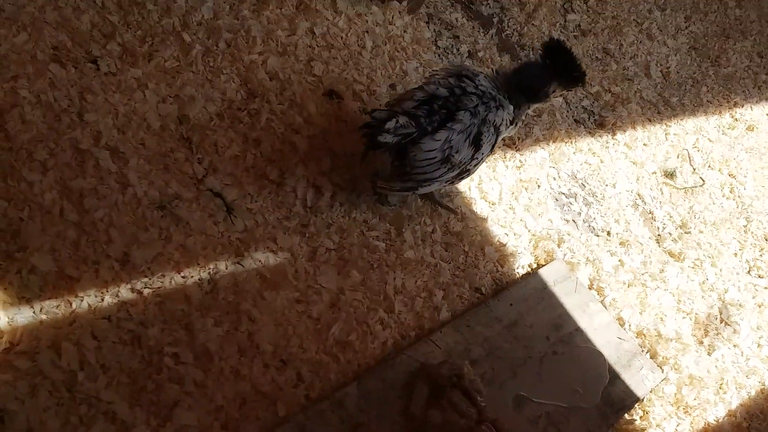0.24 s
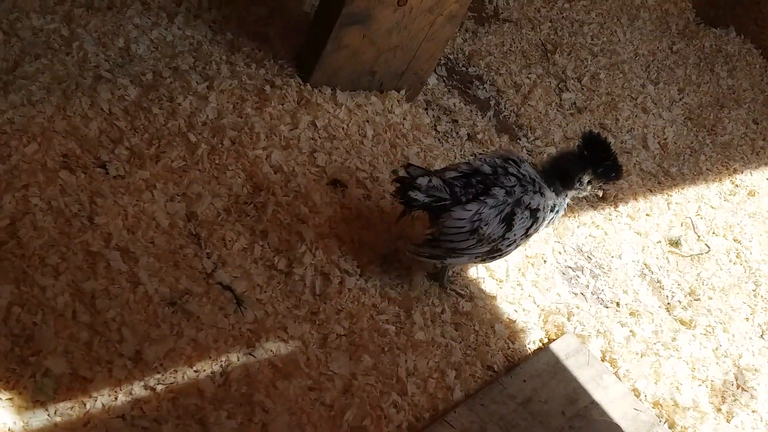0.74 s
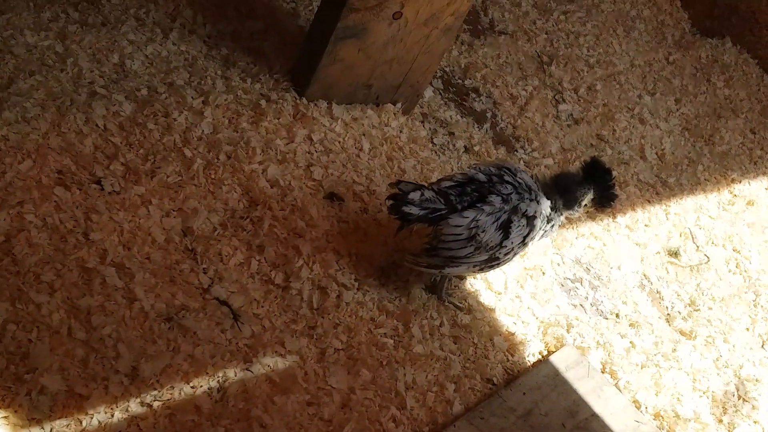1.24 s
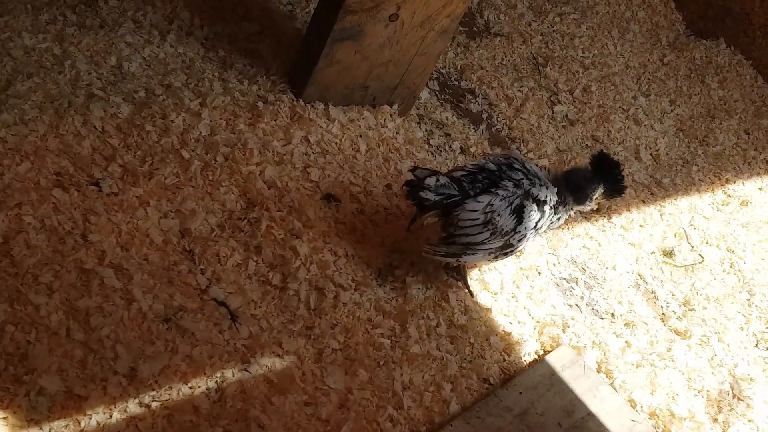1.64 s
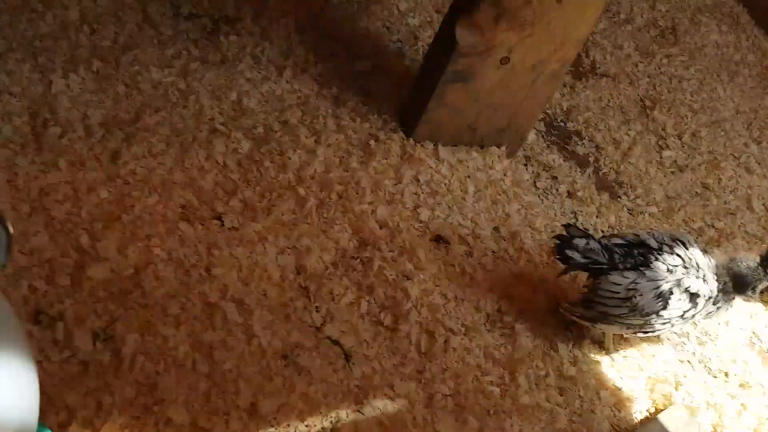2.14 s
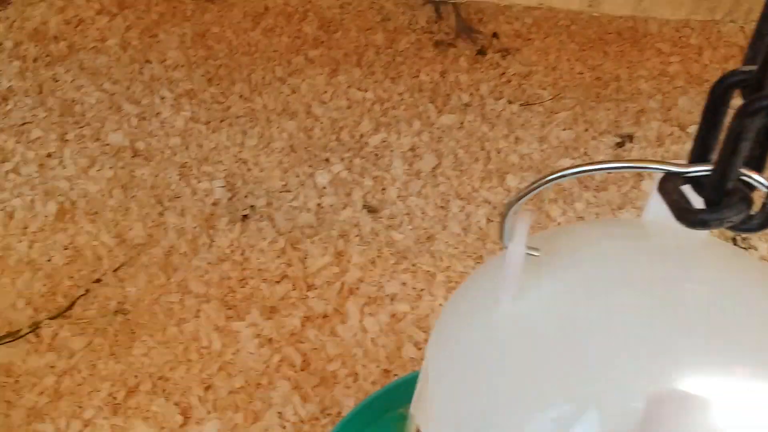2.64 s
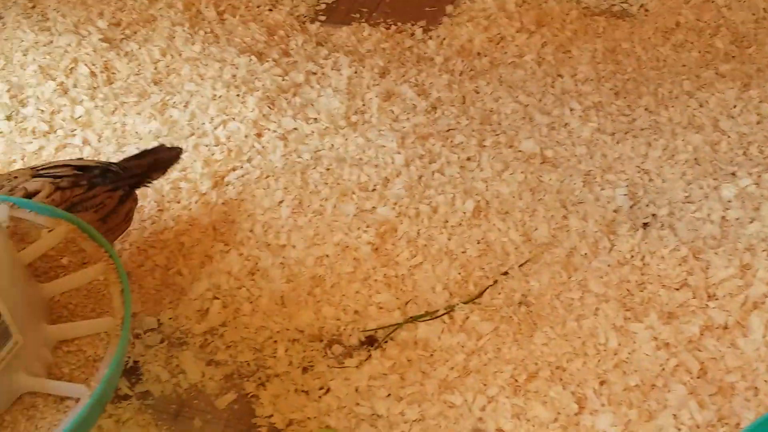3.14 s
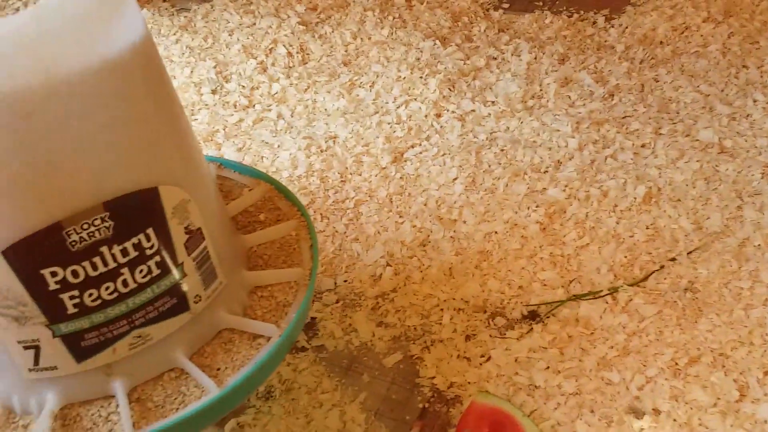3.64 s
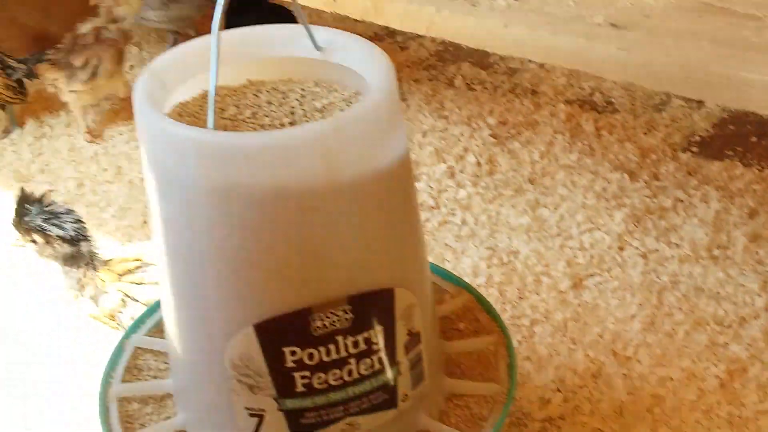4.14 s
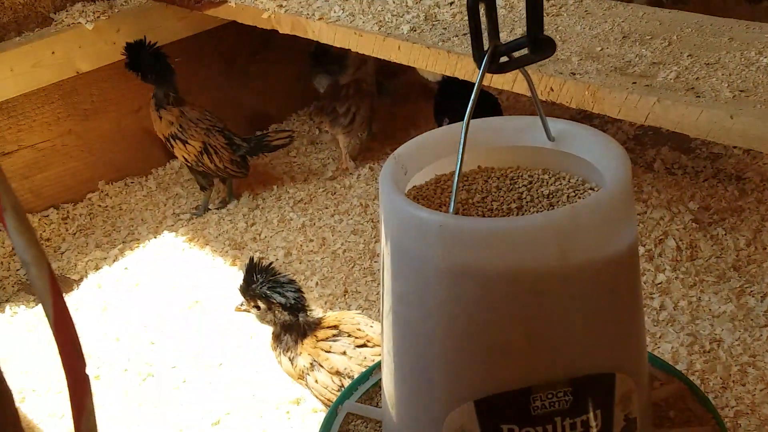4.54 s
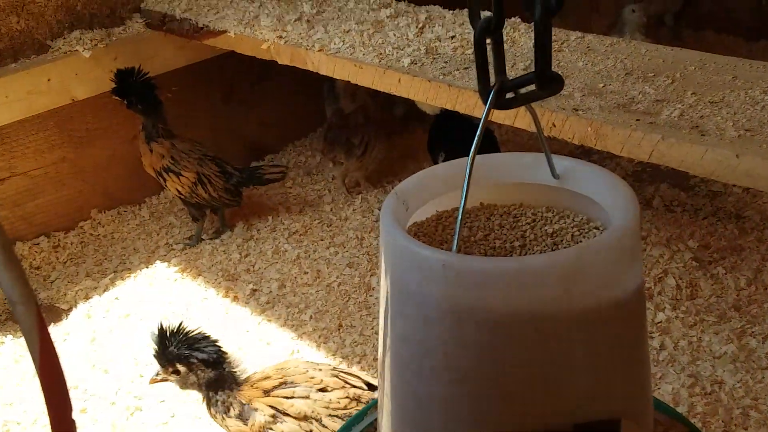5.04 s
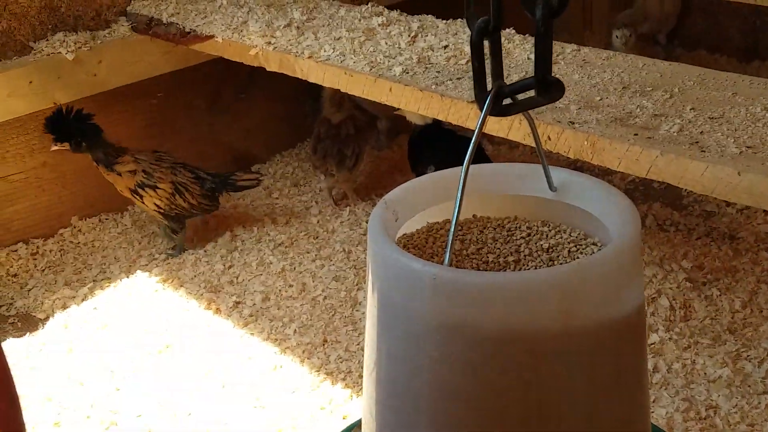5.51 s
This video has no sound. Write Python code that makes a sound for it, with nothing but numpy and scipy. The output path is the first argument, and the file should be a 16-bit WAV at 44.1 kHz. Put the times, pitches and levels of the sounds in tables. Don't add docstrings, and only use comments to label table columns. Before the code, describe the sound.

A flock of young chickens gives short, hoarse, falling peeps in a small wooden coop. A piercing cry comes around one and a half seconds, then a close twig snap, gritty shoe scuff and low board thump just after two. Peeping resumes, with low clucks from older birds. Stereo microphones sit among the flock, with short close wall reflections.

```python
import sys
import numpy as np
from scipy import signal
from scipy.fft import rfft, irfft, next_fast_len
from scipy.io import wavfile
from scipy.ndimage import uniform_filter1d, map_coordinates

SR = 44100
rng = np.random.default_rng(int(sys.argv[2]) if len(sys.argv) > 2 else 0)


def undo_db(level):
    steps = np.asarray(level, float) / 20
    return 10 ** steps


def transcribe(signal):
    frames = np.atleast_2d(signal).T
    limited = np.clip(frames, -1, 1)
    pcm = np.round(limited * 32767).astype(np.int16)
    wavfile.write(sys.argv[1], SR, pcm)


N = 254699


def unit(x):
    return x / np.sqrt(np.mean(x ** 2) + 1e-20)


def along(points, hz):
    f, v = np.transpose(points)
    return np.interp(np.log(hz + 1), np.log(f + 1), v)


def curves(rows):
    s, *cols = np.transpose(rows)
    return [np.interp(np.arange(N) / SR, s, c) for c in cols]


def wobble(rate, size=N):
    knots = rng.standard_normal(int(size * rate / SR) + 4)
    return map_coordinates(knots, [np.arange(size) * rate / SR])


def filtered(x, response):
    m = next_fast_len(N + 8192)
    return irfft(rfft(x, m) * response(np.fft.rfftfreq(m, 1 / SR)), m)[..., :N]


def panned(db):
    return np.sqrt(2 / (1 + undo_db(np.multiply.outer([-2, 2], db))))


def bursts(rows, rise_s, fall_s):
    t = np.arange(N) / SR
    total = 0
    for s, hold, db in rows:
        rise = 60 * np.maximum(s - t, 0) / rise_s
        fall = 60 * np.maximum(t - s - hold, 0) / fall_s
        total = total + undo_db(db - rise - fall)
    return total


# frequency in Hz, likeness from 0 to 1.
ALIKE = [(60, 0.87), (240, 0.89), (950, 0.41), (3770, 0.25), (15000, 0.35)]


def rush(spectrum, grain_db, grain_rate):
    pair = rng.standard_normal((2, N)) * undo_db(grain_db * wobble(grain_rate))

    def mid_side(hz):
        turn = np.arccos(np.clip(along(ALIKE, hz), 0, 1)) / 2
        return undo_db(along(spectrum, hz)) * [np.cos(turn), np.sin(turn)]

    mid, side = filtered(pair, mid_side)
    return unit(np.array([mid + side, mid - side]))


# frequency in Hz, level in dB per Hz.
AIR = [(150, -36), (250, -12), (1410, -9), (2000, -20), (3140, -24), (4360, -7), (8200, 12), (8800, -24)]


def still_air():
    return undo_db(-80 + 1.1 * wobble(2.5)) * rush(AIR, grain_db=1, grain_rate=14)


# frequency in Hz, level in dB per Hz.
RUMBLE = [(15, -69), (30, -21), (45, -4), (103, 3), (129, 1), (200, -16.5), (390, -12.5), (660, -120)]
# start in seconds, hold in seconds, level in dB.
TRAMPLES = [
    (0.0, 0.025, -62),
    (1.3, 0.057, -71.5),
    (2.25, 0.072, -72),
    (2.62, 0.21, -76),
]
# time in seconds, peak in dB, pitch in Hz.
STEPS = [(0.566, -46, 198), (0.828, -53.5, 319), (5.374, -54, 270), (0.657, -45, 114), (0.793, -40.5, 112),
         (0.962, -37.5, 135), (1.992, -38, 116), (2.082, -35, 166), (2.325, -24, 209.5), (2.562, -78, 111),
         (2.997, -65, 99), (3.352, -63, 94.2), (3.46, -49.5, 118), (3.561, -37, 118), (3.976, -44, 112),
         (5.019, -65, 104), (5.218, -75, 97), (5.365, -36.5, 118), (5.542, -60, 98)]


def boards():
    thuds = np.zeros(N + SR)
    t = np.arange(SR // 8) / SR
    for s, db, hz in STEPS:
        envelope = undo_db(db - 9.5 - 60 * t / 0.14) * (1 - np.exp(-t / 0.0018))
        thuds[round(s * SR):][:len(t)] += envelope * np.sin(2 * np.pi * hz * t)
    tread = undo_db(-73.5) + bursts(TRAMPLES, rise_s=0.17, fall_s=0.63)
    rumble = undo_db(6.0) * tread * rush(RUMBLE, grain_db=1.5, grain_rate=28)
    return thuds[:N] * panned(0.97)[:, None] + rumble


# frequency in Hz, level in dB per Hz.
RUSTLE = [(140, -42), (230, -11), (316, -13), (487, -2.5), (582, -5), (778, 0), (997, -4), (1130, -4.5),
          (1900, -10.5), (2470, -9.5), (4180, -120)]
# frequency in Hz, level in dB per Hz.
HISS = [(1760, -12), (3000, -7.5), (3350, -11), (4300, -9), (4940, -11), (9150, -15), (11900, -11.5),
        (15700, -14.5)]
# time in seconds, left-right difference in dB.
SIDE_OF_LITTER = [(0.0, -2), (1.8, -1.5), (1.98, -6.5), (2.77, -8.5), (2.91, -6.5), (5.78, -4.5)]
# time in seconds, level in dB.
BUSY = [(0.0, -70.5), (0.42, -76), (0.7, -70), (1.06, -73), (1.2, -64.5), (1.75, -78), (2.06, -68),
        (2.5, -70.5), (3.2, -71), (3.62, -60), (3.86, -68), (4.3, -71), (4.63, -75.5), (5.78, -74)]
# start in seconds,
# hold in seconds, hiss in dB, rustle in dB over the hiss.
KICKS = [(0.031, 0.015, -61.5, -42), (0.178, 0.15, -70.5, -11), (0.548, 0.015, -70, -0.5),
         (0.781, 0.02, -63, -19), (0.963, 0.016, -70, -7), (1.325, 0.012, -87, 23.5),
         (1.803, 0.017, -70, -26), (2.328, 0.014, -76, 35), (2.632, 0.063, -59.5, -23),
         (2.828, 0.048, -74.5, 15), (2.897, .01, -70, 0), (2.993, 0.011, -73, 11.5),
         (3.109, 0.014, -70, 0.5), (3.234, 0.013, -71.5, 6.5), (3.365, 0.022, -65.5, -34),
         (3.96, 0.19, -65.5, 0), (4.261, 0.068, -69.5, -7), (4.749, 0.028, -71.5, -4),
         (5.024, 0.2, -77, -7), (5.345, 0.018, -69.5, -17), (5.78, .01, -99, 2)]
KICK_RISE_S, KICK_FALL_S = 0.23, 0.15
# start in seconds, hold in seconds, scrape in dB, hiss in dB.
DRAGS = [
    (2.086, 0.16, -46, -55),
    (2.17, 0.076, -59, -71),
    (2.614, 0.096, -54.5, -62.5),
    (2.796, 0.33, -64.5, -101),
    (3.977, 0.14, -64.5, -100),
]
DRAG_RISE_S, DRAG_FALL_S = 0.045, 0.19


def litter():
    busy_db, = curves(BUSY)
    drags = bursts([(s, hold, hiss_db) for s, hold, _, hiss_db in DRAGS], DRAG_RISE_S, DRAG_FALL_S)
    dull_kicks = [(s, hold, db + over_db) for s, hold, db, over_db in KICKS]
    fine_kicks = [row[:3] for row in KICKS]
    stir = undo_db(-69.5 + 0.19 * (busy_db - busy_db.mean()))
    stir = stir + bursts(dull_kicks, KICK_RISE_S, KICK_FALL_S)
    dust = undo_db(busy_db) + bursts(fine_kicks, KICK_RISE_S, KICK_FALL_S)
    rustle = (stir + undo_db(11.5) * drags) * rush(RUSTLE, grain_db=1.5, grain_rate=220)
    hiss = (dust + drags) * undo_db(3.0) * rush(HISS, grain_db=1.5, grain_rate=500)
    return panned(curves(SIDE_OF_LITTER)[0]) * (rustle + hiss)


# time in seconds, peak in dB.
TICKS = [(2.083, -46), (2.227, -46), (2.247, -54), (1.8, -53), (2.989, -54), (0.88, -56), (.795, -52),
         (2.2, -60), (5.034, -60), (2.4, -52)]


def cracks():
    out = np.zeros((2, N + SR))
    t = np.arange(SR // 100) / SR
    for s, db in TICKS:
        puff = rng.standard_normal(len(t)) * undo_db(db - 4 - 60 * t / 0.0032)
        out[:, round(s * SR):][:, :len(t)] += panned(0)[:, None] * puff
    return out[:, :N]


# frequency in Hz, width in Hz, level in dB.
GROAN = [(135, 46, -2), (216, 15, -2.5)]
# start in seconds, hold in seconds, groan in dB.
LOADS = [
    (2.12, .12, -62),
    (2.27, 0.026, -45.5),
    (2.35, 0.022, -35),
    (2.7, 0.064, -61),
]


def groaning_board():
    def ring(f):
        total = 0
        for k, (centre, width, db) in enumerate(GROAN):
            total = total + (-1) ** k * undo_db(db) * 1j * f * width / (centre ** 2 - f ** 2 + 1j * f * width)
        return total

    shared, own = filtered(rng.standard_normal((2, N)), lambda f: ring(f) ** 2)
    groan = unit(np.array([shared + 1.35 * own, shared - 0.12 * own]))
    return bursts(LOADS, rise_s=0.31, fall_s=0.06) * panned(3.6)[:, None] * groan


# frequency in Hz, level in dB per Hz.
SCRAPE = [(530, -14), (900, -60), (1440, -10.5), (1890, -5.5), (2020, -1.5), (2270, -7), (2750, -1.5),
          (4670, -23), (9000, -77), (11700, -69), (19800, -120)]
# start in seconds, hold in seconds, level in dB.
RUBS = [
    (2.205, 0.054, -38.5),
    (2.61, 0.05, -52.5),
]
# start in seconds, hold in seconds, level in dB.
SLIP = [
    (2.295, 0.093, -54),
]
# frequency in Hz, level in dB per Hz.
SLIP_COLOUR = [(350, -28), (550, -7), (1350, -1), (1750, -27), (2200, -9), (2900, 9), (3600, -25),
               (5000, -120)]


def scuffing_sole():
    rub_colour = [(600, -20), (720, -1), (790, -2.0), (870, -0.5), (1050, -40.5)]  # (Hz, dB per Hz)
    rub = bursts(RUBS, rise_s=0.085, fall_s=0.032) * panned(-25)[:, None]
    rub = rub * rush(rub_colour, grain_db=1.5, grain_rate=60)
    scrape = bursts([row[:3] for row in DRAGS], DRAG_RISE_S, DRAG_FALL_S) * undo_db(5.5)
    scrape = scrape * panned(-20)[:, None] * rush(SCRAPE, grain_db=-0.5, grain_rate=160)
    slip = bursts(SLIP, rise_s=0.079, fall_s=0.055) * panned(6)[:, None]
    slip = slip * rush(SLIP_COLOUR, grain_db=2.0, grain_rate=220)
    return rub + scrape + slip


# frequency in Hz, level in dB, time to lose 60 dB in seconds.
TWIG = [(2740, 5, 0.0029), (7650, -15.5, 0.0036), (1300, 1, 0.0026)]
# time in seconds, peak in dB.
SNAP = [
    (2.0845, -15),
]


def twig():
    out = np.zeros((2, N))
    t = np.arange(SR // 10) / SR
    for s, db in SNAP:
        snap = 0
        for hz, level, t60 in TWIG:
            snap = snap + undo_db(db + 7.0 + level - 60 * t / t60) * np.sin(2 * np.pi * hz * t)
        snap = snap * (1 - np.exp(-t / 0.00056))
        out[:, round(s * SR):][:, :len(t)] += panned(-19)[:, None] * snap
    return out


def coop(echo_db, hold=0.03, t60=0.17):
    t = np.arange(SR // 6) / SR
    noise = rng.standard_normal((2, 3, len(t))) * undo_db(2.6 * wobble(482.5, size=len(t)))
    first, later = 0.71 * noise[:, :1] + noise[:, 1:]
    first = first * undo_db(-60 * t / 0.06)
    later = later * undo_db(-60 * (t / 0.24 + np.maximum(t - hold, 0) / t60))

    def energy(tail):
        return tail / np.linalg.norm(tail, axis=1, keepdims=True)

    answer = energy(first) + undo_db(echo_db) * energy(later)
    answer[:, 0] += 0.75
    colour = rfft(answer, 2 * len(t))
    even = colour / np.sqrt(uniform_filter1d(abs(colour) ** 2, size=60, axis=1))
    return irfft(even)[:, :len(t)]


# frequency in Hz, level in dB.
OCTAVE = [(2400, -14.5), (4300, -19), (5300, -24), (6200, -30), (8000, -23.5), (9500, -45)]
# time in seconds, left-right difference in dB.
FACING = [(0.0, 0.5), (.3, 3.5), (.55, 0), (.8, 2), (1.2, 0.5), (1.5, 3.5), (1.75, 6), (2.35, -1),
          (2.6, -4), (2.9, -4.5), (3.2, -5), (3.6, -5), (3.9, -3.5), (4.3, -4), (4.7, -3), (5.0, -3.5),
          (5.3, -6.5), (5.78, -3.5)]
NEAR_DB, WETTER = -49.5, 0.31
EASE = 0.45
PULSE_HZ = 42


def peeps(rows, crest, hook, bend, loudest, onset_db, tail_db, echo_db, pan_db=0, hoarse=1, reed_db=0,
          broken_db=0):
    out = np.zeros((2, N + SR))
    crest, loudest = np.clip([crest, loudest], 0.01, 0.99)
    for s, length, top_hz, end_hz, db in rows:
        t = np.arange(s - 0.004, s + length + 0.0072, 1 / SR)
        u = np.clip((t - s) / length, 0, 1)

        def chance(rate):
            return wobble(rate, size=SR // 4)[:len(t)]

        fall = np.clip((u - crest) / (1 - crest), 0, 1) ** bend
        eased = EASE * (0.5 - 0.5 * np.cos(np.pi * fall)) + (1 - EASE) * fall
        climb = 1 - hook * np.clip(1 - u / crest, 0, 1) ** 2
        hz = top_hz * climb - (top_hz - end_hz) * eased
        waver_hz = 75 * hoarse * chance(220)
        phase = 2 * np.pi * np.cumsum(hz + waver_hz) / SR

        level_db = db + np.interp(u, [0, loudest, 1], [onset_db, 0, tail_db])
        throb_db = broken_db * np.cos(2 * np.pi * PULSE_HZ * (t - s - 0.009))
        flutter = undo_db(2 * chance(200) + throb_db) + 0.15 * chance(900)
        edges = np.clip(np.minimum((t - t[0]) / 0.0016, (t[-1] - t) / 0.018), 0, 1)
        octave = undo_db(along(OCTAVE, 2 * hz) + reed_db) * np.sin(2 * phase)
        voice = edges * flutter * undo_db(level_db + 10.5) * (np.sin(phase) + octave)

        side = panned(pan_db + np.interp(s, *np.transpose(FACING)))
        path = coop(echo_db + WETTER * (NEAR_DB - db))
        heard = signal.fftconvolve(voice[None], path, axes=1)
        expected = np.linalg.norm(voice) * np.linalg.norm(path, axis=1)
        heard = heard * (side * expected / np.linalg.norm(heard, axis=1))[:, None]
        start = round(t[0] * SR) + SR // 10
        out[:, start:start + heard.shape[1]] += heard
    return out[:, SR // 10:][:, :N]


# start and length in seconds, top and end pitch in Hz, level in dB; so in all the calls below.
CLUCKS = [(3.65, 0.069, 1317, 1392, -70.5), (3.726, 0.05, 1297, 1270, -63.5),
          (4.3, 0.036, 1396, 1224, -59.5), (4.825, 0.044, 1590, 1254, -65.5), (4.88, 0.035, 638, 590, -70),
          (5.33, 0.0554, 1342, 1253, -57.5)]
# start and length in seconds, top and end in Hz, level in dB.
MURMURS = [(0.3, 0.037, 1096, 1050, -73.5), (.6, .15, 1570, 1520, -78.5), (.665, .17, 460, 390, -72.5),
           (5.18, .05, 1523, 1480, -71.5), (1.95, 0.12, 1333, 1266, -76), (3.36, 0.049, 1436, 1220, -71),
           (3.93, 0.15, 1550, 1347, -67), (5.17, 0.086, 1173, 1136, -63), (5.66, 0.071, 1436, 1516, -68.5)]
# start and length in seconds, top and end in Hz, level in dB.
RASPS_FAR = [
    (1.37, 0.042, 4560, 2960, -66.5),
    (5.185, 0.06, 3650, 3084, -66),
    (5.17, .07, 2750, 2650, -70),
]


def distant_birds():
    clucks = peeps(CLUCKS, crest=0.073, hook=0.0092, bend=0.89, loudest=0.99, onset_db=-3.5, tail_db=-4.5,
                   echo_db=-5.5, pan_db=-4.5, hoarse=0.51, broken_db=4.5)
    murmurs = peeps(MURMURS, crest=0.114, hook=0.015, bend=0.97, loudest=0.9, onset_db=-1.5, tail_db=-3.5,
                    echo_db=-10.0, pan_db=-6.5, hoarse=1.35, broken_db=-1.0, reed_db=-6)
    rasps = peeps(RASPS_FAR, crest=0.28, hook=0.07, bend=0.78, loudest=0.49, onset_db=-2.5, tail_db=-10.0,
                  echo_db=9.0, pan_db=-6, hoarse=7.5, reed_db=-15)
    return clucks + murmurs + rasps


# start and length in seconds, top and end in Hz, level in dB.
ARCHED = [(0.495, 0.036, 2850, 2200, -52.5), (0.528, 0.08, 3880, 2850, -50.5),
          (0.664, 0.088, 3850, 2480, -45.5), (2.49, 0.057, 3010, 2590, -48),
          (3.882, 0.029, 3950, 3620, -51), (4.015, 0.065, 3710, 2635, -43.5),
          (4.715, 0.046, 3997, 2895, -53), (4.715, 0.042, 3790, 3300, -50.5),
          (4.852, 0.069, 3804, 2670, -50.5), (5.005, 0.058, 3944, 2930, -44)]
# start and length in seconds, top and end in Hz, level in dB.
SLIDING = [(0.135, 0.047, 3910, 3170, -63), (0.262, 0.03, 3110, 2350, -52), (0.775, 0.055, 3305, 2378, -54),
           (0.925, 0.021, 3570, 3550, -65), (0.945, 0.05, 3230, 2660, -54.5),
           (1.17, 0.065, 3450, 2660, -51), (2.48, 0.068, 4000, 3180, -52.5),
           (2.812, 0.046, 3425, 2480, -51.5), (3.566, 0.025, 3050, 2554, -47.5),
           (3.695, 0.076, 2505, 2145, -49), (4.732, 0.057, 3160, 2404, -49.5),
           (4.945, .05, 3600, 2550, -56), (3.755, 0.045, 3730, 2970, -54), (4.78, 0.026, 2470, 2210, -57.5),
           (4.805, 0.022, 2900, 2700, -55.5), (4.945, 0.091, 3030, 2210, -53),
           (5.03, 0.05, 2876, 2465, -52)]
# start and length in seconds, top and end in Hz, level in dB.
SWELLING = [
    (1.22, 0.049, 3410, 2167, -43),
    (4.645, 0.06, 3460, 2220, -60),
]
# start and length in seconds, top and end in Hz, level in dB.
PIPS = [(1.392, 0.021, 2490, 2250, -54.5), (.742, .012, 2620, 2480, -48), (3.005, .025, 2520, 2400, -45),
        (2.895, 0.025, 2500, 2400, -50)]
# start and length in seconds, top and end in Hz, level in dB.
FLICKS = [
    (1.518, 0.016, 3850, 2230, -41),
    (1.712, 0.021, 3580, 2400, -46.5),
]
# start and length in seconds, top and end in Hz, level in dB.
DIVE = [
    (1.477, 0.044, 4830, 2352, -34),
]
# start and length in seconds, top and end in Hz, level in dB.
REEDY = [(-0.02, 0.065, 2600, 2120, -44), (0.128, 0.1, 3250, 2150, -50), (0.27, 0.034, 2380, 2120, -59),
         (0.885, 0.075, 2638, 2100, -47), (1.145, 0.025, 2560, 2540, -56), (1.172, 0.06, 2740, 2185, -46),
         (2.575, 0.061, 2700, 2195, -47), (2.996, 0.031, 2860, 2376, -40.5),
         (3.955, 0.0406, 2910, 2420, -44), (4.51, 0.049, 3150, 2120, -56.5),
         (5.642, 0.041, 2880, 2557, -55), (5.685, 0.028, 3060, 2335, -53)]
# start and length in seconds, top and end in Hz, level in dB.
CRESTING = [(1.262, 0.085, 3880, 2650, -49), (3.203, 0.048, 3530, 2520, -43.5),
            (3.886, .052, 3900, 2600, -44), (2.342, .045, 3550, 2750, -44.5)]
# start and length in seconds, top and end in Hz, level in dB.
HIDDEN = [(4.287, .05, 3200, 2620, -49.5), (4.128, .036, 3050, 2250, -50.5),
          (2.32, 0.037, 4050, 3300, -53.5), (3.2, 0.0357, 3700, 3700, -59.5)]
# start and length in seconds, top and end in Hz, level in dB.
SHALLOW = [
    (2.988, .06, 3393, 2945, -50.5),
    (3.74, 0.0526, 2830, 2687, -48),
]


def chicks():
    arched = peeps(ARCHED, crest=0.1686, hook=0.0384, bend=1.1, loudest=0.28, onset_db=-13.5, tail_db=-8.5,
                   echo_db=-2.5, pan_db=0.3)
    sliding = peeps(SLIDING, crest=0.033, hook=0.0081, bend=0.75, loudest=0.47, onset_db=-12.5, tail_db=-9.5,
                    echo_db=-3.5, pan_db=-0.5)
    swelling = peeps(SWELLING, crest=0.12, hook=0.062, bend=0.9, loudest=0.78, onset_db=-16, tail_db=-2.0,
                     echo_db=-4, pan_db=1.0)
    pips = peeps(PIPS, crest=0.017, hook=0.013, bend=0.52, loudest=0.41, onset_db=-1.0, tail_db=4.0,
                 echo_db=-3.0, pan_db=0.0)
    flicks = peeps(FLICKS, crest=0.357, hook=0.219, bend=0.86, loudest=0.62, onset_db=-10.5, tail_db=-2.0,
                   echo_db=11.0, pan_db=-3.5, hoarse=1.45)
    dive = peeps(DIVE, crest=0.42, hook=0.55, bend=0.79, loudest=0.93, onset_db=-34.5, tail_db=-6.0,
                 echo_db=14.0, pan_db=-3.5, hoarse=0.66)
    reedy = peeps(REEDY, crest=0.096, hook=0.017, bend=0.73, loudest=0.44, onset_db=-14.5, tail_db=-9.0,
                  echo_db=-3.0, pan_db=-0.2, reed_db=8.0)
    cresting = peeps(CRESTING, crest=0.21, hook=0.093, bend=0.9, loudest=0.59, onset_db=-21, tail_db=-12,
                     echo_db=-3.5, pan_db=2.0)
    hidden = peeps(HIDDEN, crest=0.248, hook=0.097, bend=0.882, loudest=1.0, onset_db=-10, tail_db=-11,
                   echo_db=3, pan_db=0.0, hoarse=2.9)
    shallow = peeps(SHALLOW, crest=0.05, hook=0.0089, bend=1.11, loudest=0.58, onset_db=-11.5, tail_db=-3.5,
                 echo_db=-3, pan_db=3.5)
    return arched + sliding + swelling + pips + flicks + dive + reedy + cresting + hidden + shallow


def scene():
    floor = still_air() + boards() + litter() + cracks()
    shoe = groaning_board() + scuffing_sole() + twig()
    return floor + shoe + distant_birds() + chicks()


def low_pass(x):
    return signal.sosfilt(signal.butter(12, 16680, fs=SR, output="sos"), x)


def record(dry):
    mix = filtered(dry, lambda hz: (hz < 15790) * hz ** 2 / (hz ** 2 + 43.6 ** 2))
    return low_pass(mix)


dry = scene()
out = record(dry)
transcribe(out)
```